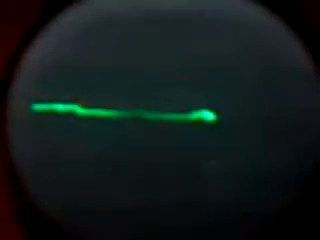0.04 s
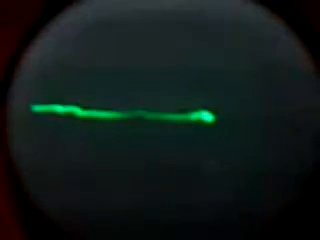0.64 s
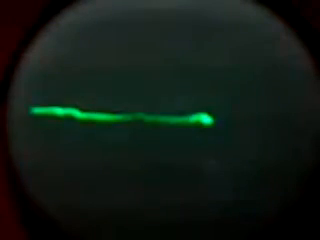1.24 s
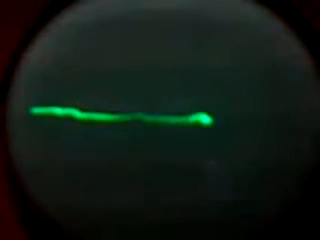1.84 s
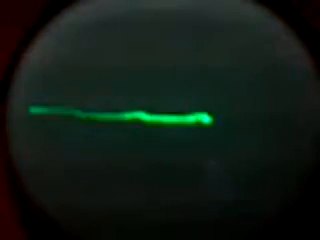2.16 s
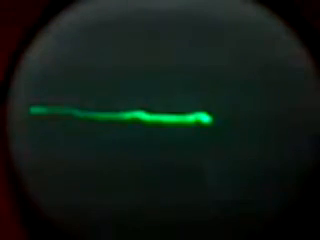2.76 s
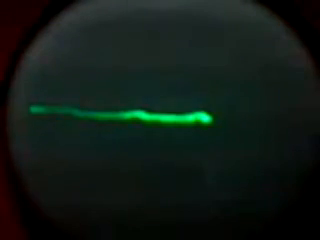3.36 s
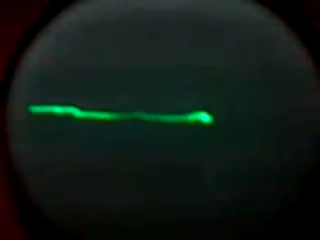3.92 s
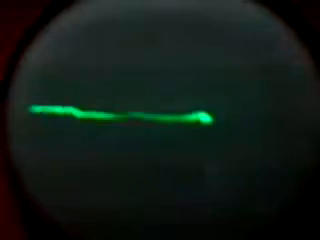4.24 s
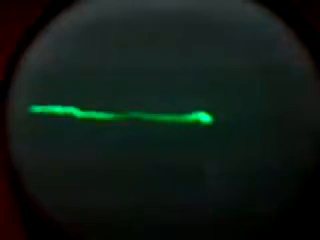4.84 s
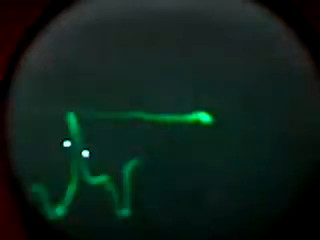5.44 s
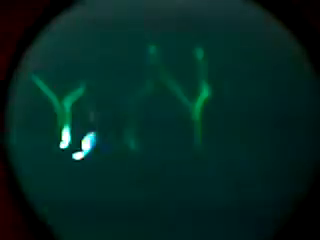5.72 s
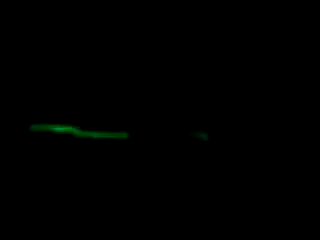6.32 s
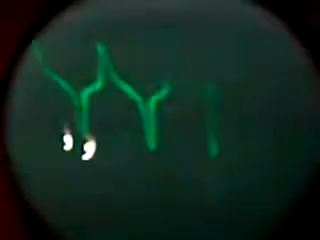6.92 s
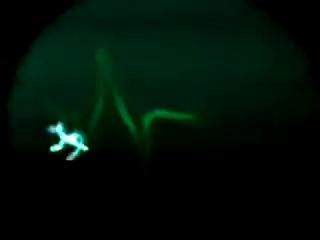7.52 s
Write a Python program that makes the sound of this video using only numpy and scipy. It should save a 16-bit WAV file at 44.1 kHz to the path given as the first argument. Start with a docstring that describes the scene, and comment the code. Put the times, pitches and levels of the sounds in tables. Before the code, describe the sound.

A transformer hums faintly in a small room under a soft hiss, with a few barely audible knocks. After almost six seconds, a high-voltage arc sizzles to life and breaks into a loud, harsh buzz with sharp cracks. It stops for about half a second, then a second burst follows. The microphone sounds narrow and overloads on the arcs.

```python
"""A power arc barks on every half cycle of the mains as a high-voltage transformer flashes over twice.
Each flashover starts as a sizzle of sparks; then the arc catches, its heat sending out pressure pulses.
The bark deepens and grows restless as the channel stretches, until it restrikes with a crack.
The core hums in the test room; faint knocks and one soft, high rustle of hiss come before the arc.
The bark overloads a narrow-band microphone."""
import sys
import numpy as np
from scipy import signal
from scipy.fft import rfft, irfft, next_fast_len
from scipy.io import wavfile

SR = 44100
rng = np.random.default_rng(int(sys.argv[2]) if len(sys.argv) > 2 else 0)


def output_pcm(signal):
    """Save a mono or channel-first signal as 16-bit PCM at the path in sys.argv[1].

    Samples are clipped to [-1, 1] before scaling.
    """
    pcm = np.clip(np.atleast_2d(signal).T, -1, 1) * 32767
    wavfile.write(sys.argv[1], SR, np.round(pcm).astype(np.int16))


N = 338688
T = np.arange(N) / SR

MAINS_HZ, FIRST_CREST_S = 50, .0041
LONG_CHANNEL_HZ = 617   # a channel pitched below this counts as long
# flashovers: start t/s, full power t/s, extinction t/s, swell/(dB/s), thickest sparks t/s
FLASHOVERS = [(5.787, 5.968, 6.549, 641.5, 6.06), (7.024, 7.257, 7.70, 421, 7.285)]
# strikes, each a new channel: t/s, relative crack level/dB, crack rise/s, bark f/Hz,
# relative bark level/dB
STRIKES = [(5.794, -15.5, 0.00078, 1150, -14.5), (5.843, -12, 0.0011, 1150, -12),
           (5.864, -14.5, 0.00048, 1150, -10), (5.884, -20.5, 0.0011, 1200, -9.5),
           (5.922, -8, 0.0013, 1240, -13.5), (6.0254, -2.5, 0.0014, 760, -10),
           (6.084, -6, 0.00095, 680, -10.5), (6.125, -2, .0016, 680, -12), (6.1626, -2, 0.0019, 747, -10),
           (6.233, -18.5, .001, 452, -12), (6.2945, -1, 0.0017, 460, -15), (6.378, -2.5, 0.0028, 740, -16),
           (6.4453, 3.5, 0.00087, 936, -17), (6.5131, -4, 0.00099, 980, -16),
           (7.019, -18, 0.0012, 1105, 0.5), (7.039, -12.5, 0.00099, 1110, -12),
           (7.123, -13, 0.0007, 1200, -11), (7.2239, -5, 0.00047, 1100, -11.5),
           (7.2438, 2.5, 0.00024, 965, -10), (7.2545, -0.5, 0.00043, 948, -12.5),
           (7.3239, 4.5, 0.0016, 1100, -17), (7.383, -5.5, 0.00072, 816, -9),
           (7.4236, 3.5, 0.0013, 616, -7), (7.463, 2.5, 0.0014, 646, -8), (7.504, 5.5, 0.001, 747, -11),
           (7.545, -3.5, .0014, 551, -11), (7.626, -6, 0.00064, 700, -15), (7.6544, -10, .0008, 670, -7.5)]


def from_db(db):
    """Amplitude ratio of a level in decibels."""
    return 10 ** (np.asarray(db) / 20)


def rms_one(x):
    """Normalisation to rms 1."""
    return x / np.sqrt(np.mean(x ** 2) + 1e-20)


def drift(rate_hz):
    """Random modulation of rms 1, by linear interpolation."""
    knots = rng.standard_normal(int(N / SR * rate_hz) + 2)
    return rms_one(np.interp(T * rate_hz, np.arange(len(knots)), knots))


def butter(order, hz, kind="low"):
    """Sections of a maximally flat filter."""
    return signal.butter(order, hz, kind, fs=SR, output="sos")


def colour(x, spectrum):
    """Minimum-phase filtering to a given spectrum; white noise keeps its power."""
    size = 2 * next_fast_len(N)
    hz, db = np.transpose(spectrum)
    bin_hz = np.arange(size // 2 + 1) * SR / size
    gain = rms_one(from_db(np.interp(np.log(bin_hz + 1), np.log(hz), db)))
    cepstrum = irfft(np.log(gain))
    cepstrum[1:size // 2] *= 2
    cepstrum[size // 2 + 1:] = 0
    return irfft(rfft(x, size) * np.exp(rfft(cepstrum)))[:N]


def resonate(x, hz, width_hz):
    """A damped resonator with unit gain at its peak."""
    r = np.exp(-np.pi * width_hz / SR)
    poles = [1, -2 * r * np.cos(2 * np.pi * hz / SR), r * r]
    return signal.lfilter(np.array([1, 0, -1]) * (1 - r * r) / 2, poles, x + 1e-18)


def core_hum(waver_db, wander_rad):
    """Forced vibration: the core sings on harmonics of the mains, each wavering a little."""
    # harmonics: f/Hz, level/dB
    harmonics = [(200, -70), (300, -57.5), (350, -59.5), (400, -58.5), (500, -61), (700, -79), (800, -62.5),
                 (1000, -61), (1300, -72), (1400, -61.5), (2600, -77)]
    out = np.zeros(N)
    for hz, db in harmonics:
        phase = 2 * np.pi * (hz * T + rng.random()) + wander_rad * drift(3.2)
        out += from_db(db + waver_db * drift(5.9)) * np.sin(phase)
    return out


def room_air(level_db, flutter_db, hiss_hz, hiss_flutter_db):
    """Amplitude-modulated noise: the room's rush flutters, and its upper hiss flickers on its own."""
    # spectrum of the rush: f/Hz, relative level/dB
    spectrum = [(15, -34), (80, -18.5), (180, -17), (265, -10), (325, -1.5), (460, -7.5), (1020, -8.5),
                (1400, -10), (2130, -18), (2650, -13), (3020, -18.5), (3280, -15.5), (3650, -34.5),
                (4250, -42), (4750, -37), (5500, -59)]
    rush = colour(rng.standard_normal(N), spectrum)
    hiss = signal.sosfiltfilt(butter(2, hiss_hz, "high"), rush)
    flicker = from_db(hiss_flutter_db * (drift(12) + drift(55)))
    return from_db(level_db + flutter_db * drift(30)) * (rush + hiss * (flicker - 1))


def knocks_and_rustle(gain_db, rise_s, width_hz, top_hz):
    """Transient excitation: noise bursts, each in one broad resonance, sound as knocks or a high rustle."""
    # faint knocks and one soft rustle of hiss (the highest row): t/s, relative level/dB, f/Hz, decay/s
    events = [(0.299, -42, 1550, .01), (1.82, -38, 800, 0.029), (2.66, -38, 3280, .02),
              (2.784, -39.5, 1020, 0.016), (2.80, -40, 1600, .014), (3.031, -40, 1070, .014),
              (3.44, -35.5, 736, 0.0078), (3.737, -34, 820, 0.024), (3.87, -42, 1480, .016),
              (3.944, -37.5, 1580, 0.0055), (4.1, -36.5, 840, 0.032), (4.591, -39, 900, 0.011),
              (5.379, -37, 810, 0.0086)]
    out, age = np.zeros(N), T[:SR // 6]
    for s, db, hz, decay_s in events:
        burst = rng.standard_normal(len(age)) * np.exp(-age / decay_s) * (1 - np.exp(-age / rise_s))
        burst = resonate(resonate(burst, hz, width_hz), hz, width_hz)
        out[int(s * SR):][:len(age)] += from_db(db + gain_db) * rms_one(burst)
    return signal.sosfilt(butter(4, top_hz), out)


def latest(rows):
    """Sample and hold: the columns of the last event begun (beforehand, of the first)."""
    rows = np.array(rows)
    return rows[np.maximum(np.searchsorted(rows[:, 0], T, "right") - 1, 0)].T


def burning(t):
    """A gate: 1 while a flashover lasts, else 0."""
    return sum((t >= start) & (t < end) for start, _, end, _, _ in FLASHOVERS)


def crests():
    """Alternating current peaks twice a cycle: the times of those peaks during the flashovers."""
    times = np.arange(FIRST_CREST_S, N / SR, 1 / (2 * MAINS_HZ))
    return times[burning(times) > 0]


def surge(sharpness, lead_s=0):
    """Periodic modulation of rms 1: a swell round every current crest."""
    return rms_one(np.exp(sharpness * np.cos(4 * np.pi * MAINS_HZ * (T - FIRST_CREST_S + lead_s))))


def spark_strength(steady_db=-31, flare_db=11.5, flare_s=0.08, trail_db=-35, trail_s=0.023):
    """Incoherent sources add in power: a sizzle flaring as the arc catches, and each crack's trail."""
    thickest_s = latest(FLASHOVERS)[4]
    flare = np.exp(-((T - thickest_s) / flare_s) ** 2)
    struck_s, crack_db, *_ = latest(STRIKES)
    trail = from_db(crack_db + trail_db) * np.exp(-np.abs(T - struck_s) / trail_s)
    return np.hypot(from_db(steady_db + flare_db * flare), trail) * burning(T)


def sizzle(gain_db, per_s, size_db, sharpness, lead_s, flicker_db):
    """Shot noise: tiny sparks of uneven size, strongest round each crest."""
    sizes = from_db(size_db * np.minimum(rng.exponential(1, N), 4)) * rng.choice([-1, 1], N)
    impulses = rms_one(sizes * (rng.random(N) < per_s / SR))
    flicker = from_db(gain_db + flicker_db * drift(100))
    return impulses * surge(sharpness, lead_s) * spark_strength() * flicker


def cracks(strike_db, snap_db, spread_db, snap_rise_s, lead_s, scatter_s):
    """Electrical breakdown: each strike tears the gap in a brief volley; lesser snaps mark the crests."""
    out, age, times = np.zeros(N), T[:SR // 50], crests()
    luck, late = rng.uniform(-1, 1, (len(times), 2)).T
    sizes = np.interp(times, T, spark_strength()) * from_db(snap_db + spread_db * luck)
    snaps = [(s, size, snap_rise_s) for s, size in zip(times - lead_s + scatter_s * late, sizes)]
    strikes = [(s, from_db(db + strike_db), rise) for s, db, rise, _, _ in STRIKES]
    for s, size, rise in strikes + snaps:
        volley = age / rise * np.exp(1 - age / rise) * rng.standard_normal(len(age))
        out[int(s * SR):][:len(age)] += size * volley[:N - int(s * SR)]
    return out


def sparks():
    """Source and filter: broadband sizzle and cracks take on one spectrum."""
    # spectrum of the sparks: f/Hz, relative level/dB
    spectrum = [(30, -30.5), (100, -10.5), (230, -12), (310, -3.5), (480, -10.5), (1000, -3), (1180, -7.5),
                (1420, 3), (1580, -5), (2100, -7.5), (2700, -1.5), (3000, -4), (3450, 2.5), (3900, -24.5),
                (4650, -17.5), (6000, -42)]
    small = sizzle(gain_db=-2.5, per_s=9300, size_db=3, sharpness=0.93, lead_s=.0001, flicker_db=1.9)
    large = cracks(strike_db=-6, snap_db=1.5, spread_db=3.5, snap_rise_s=.0007,
                   lead_s=.0008, scatter_s=.0007)
    return colour(small + large, spectrum)


def arc_state(sag_octaves_per_s=8.4, db_per_octave=4, warm_up_s=0.044, sparking_db=-30.5):
    """Buoyancy bows the hot channel longer, so louder and deeper: relative level/dB, f/Hz, unrest."""
    _, full_s, _, swell, _ = latest(FLASHOVERS)
    struck_s, _, _, hz, db = latest(STRIKES)
    bowing_since = np.maximum(struck_s, full_s - warm_up_s)
    octaves = sag_octaves_per_s * np.maximum(T - bowing_since, 0) * burning(T)
    age = T - full_s
    level_db = db + np.clip(swell * age, sparking_db, 0) + db_per_octave * octaves
    unrest = np.minimum(0.11 + 2.31 * np.maximum(age, 0), 0.84)   # it writhes more the longer it burns
    return level_db, hz * 2 ** -octaves, unrest


def bark(gain_db, spread_db, pitch_spread, writhe_s, lead_s, low_hz, top_hz):
    """Thermal expansion: one pressure pulse each half cycle; unrest varies its time, pitch and level."""
    times, out = crests(), np.zeros(N)
    chance = rng.uniform(-1.15, 1, (len(times), 3))
    states = [np.interp(times, T, control) for control in arc_state()]
    for k, (s, db, hz, unrest, luck) in enumerate(zip(times, *states, chance)):
        stretch, late, swell = unrest * luck
        near = slice(int((s - .01) * SR), int((s + .01) * SR))
        turns = hz * np.exp(pitch_spread * stretch) * (T[near] - s + lead_s - writhe_s * late)
        cycles = 0.7 * max(LONG_CHANNEL_HZ / hz, 1) ** 0.76   # a long channel rings for more cycles
        # the thin hot centre swells twice as fast as the sheath round it
        sheath, centre = (np.cos(2 * np.pi * u - 0.18) * np.exp(-(u / cycles) ** 2)
                          for u in (turns, 2 * turns))
        polarity_db = 0.1 * (-1) ** k   # the two polarities burn unequally
        strength = from_db(gain_db + db + spread_db * swell + polarity_db)
        out[near] += strength * rms_one(sheath + 0.33 * centre)
    out = signal.sosfilt(butter(1, low_hz, "high"), out)   # a thin channel radiates little bass
    return signal.sosfilt(butter(6, top_hz), out)


def roar(gain_db, sharpness, calm, bright_hz, dulling):
    """Turbulence in hot air pumped by the current: a restless arc stirs more, a long one is duller."""
    # spectrum of the hot air: f/Hz, relative level/dB
    spectrum = [(20, -32.5), (60, -9), (110, -7), (220, -1.5), (300, -2.5), (1000, 0), (1450, -9.5),
                (1650, -13.5), (3000, -16.5), (5000, -45.5)]
    arc_db, hz, unrest = arc_state()
    flow = from_db(arc_db + gain_db) * (calm + unrest) * burning(T) * surge(sharpness)
    rush = colour(flow * rng.standard_normal(N), spectrum)
    low = signal.sosfiltfilt(butter(2, bright_hz), rush)
    return low + (rush - low) * (hz / LONG_CHANNEL_HZ) ** dulling


def load_hum(gain_db, octave_db):
    """Forced vibration: under the arc's load the core drones at twice and four times the mains rate."""
    drone = np.sin(4 * np.pi * MAINS_HZ * T) + from_db(octave_db) * np.sin(8 * np.pi * MAINS_HZ * T)
    return from_db(arc_state()[0] + gain_db) * burning(T) * drone


def enclosure(x):
    """Resonance: the modes of the enclosure add to the direct sound."""
    # modes: f/Hz, bandwidth/Hz, level/dB
    modes = [(197.1, 9, 4), (294.8, 21, -4.5), (337, 17.6, 7.5), (393.3, 16, 2.5), (520, 24, 2),
             (597, 24, -1.5), (693, 5, -13.5), (849, 200, 0), (957, 12, 0.5), (1064, 36, 0.5),
             (1172, 58, -1.5), (1362, 64, 1.5)]
    return x + sum(from_db(db) * resonate(x, hz, width) for hz, width, db in modes)


def room(x, tail_db, build_s, t60_s=0.18):
    """Reverberation: a few near reflections, then a diffuse tail that decays exponentially."""
    # early reflections: delay/ms, amplitude ratio
    echoes = [(1.95, 0.073), (3.02, 0.24), (5.2, 0.051), (7.1, 0.12)]
    age = T[:SR // 2]
    tail = rng.standard_normal(len(age)) * from_db(-60 * age / t60_s) * (1 - np.exp(-age / build_s))
    early = sum(gain * np.interp(T - ms / 1000, T, x) for ms, gain in echoes)
    return x + early + from_db(tail_db) * signal.fftconvolve(x, tail / np.linalg.norm(tail))[:N]


def scene():
    """Superposition: arc, sparks, knocks and rustle reverberate over the hum and the air."""
    arc = bark(gain_db=-5, spread_db=5.5, pitch_spread=0.47, writhe_s=0.00056, lead_s=.0003,
               low_hz=109, top_hz=1543)
    arc += roar(gain_db=-3.5, sharpness=0.86, calm=0.084, bright_hz=800, dulling=1.3)
    transients = sparks()
    background = core_hum(waver_db=1.94, wander_rad=0.34)
    background += room_air(level_db=-48.4, flutter_db=1.84, hiss_hz=2000, hiss_flutter_db=1.73)
    background += load_hum(gain_db=-28.5, octave_db=5)
    transients += knocks_and_rustle(gain_db=-17.5, rise_s=0.00033, width_hz=600, top_hz=2840)
    arc = room(enclosure(arc), tail_db=-10, build_s=0.0064)
    transients = room(transients, tail_db=-8.5, build_s=0.009)
    return (arc + transients + background)[None]


def limiter(x, ceiling, attack_s, release_db_per_s):
    """Compression: the gain ducks for every loud peak and recovers; the sharpest peaks slip through."""
    over_db = 20 * np.log10(np.maximum(np.abs(x) / ceiling, 1))
    held_db = np.maximum.accumulate(over_db + release_db_per_s * T, axis=-1) - release_db_per_s * T
    r = np.exp(-1 / (attack_s * SR))
    return x * from_db(-signal.filtfilt([1 - r], [1, -r], held_db))


def overload(x, top, hardness):
    """Saturation: peaks are flattened just under full scale."""
    return x / (1 + np.abs(x / top) ** hardness) ** (1 / hardness)


def record(dry):
    """Band limiting and distortion: a narrow-band microphone, a limiter, an overloaded input, hiss."""
    mic_low_hz, mic_top_hz, stopband_hz = 44.5, 4740, 16900
    narrow = signal.sosfilt(signal.cheby1(8, .5, mic_top_hz, fs=SR, output="sos"), dry)
    held = limiter(narrow, ceiling=0.9, attack_s=0.00013, release_db_per_s=448.5)
    held = signal.sosfilt(butter(1, mic_low_hz, "high"), held)
    loud = overload(held, top=.95, hardness=60)
    hiss = from_db(-99.5) * rng.standard_normal(N)
    return signal.sosfilt(signal.cheby2(12, 70, stopband_hz, fs=SR, output="sos"), loud + hiss)


dry = scene()
out = record(dry)
output_pcm(out)
```